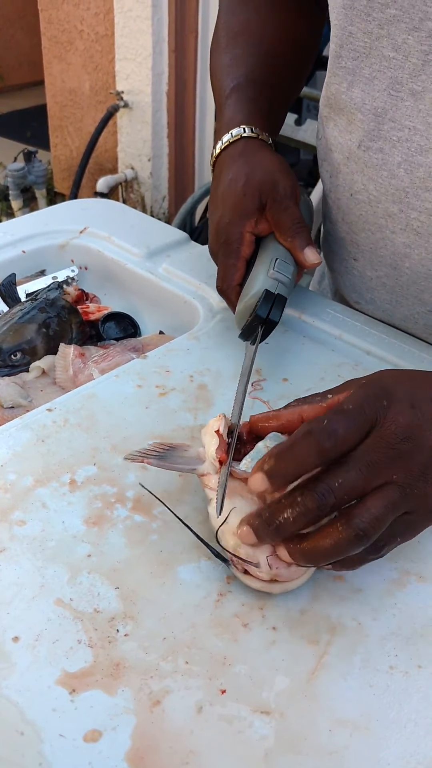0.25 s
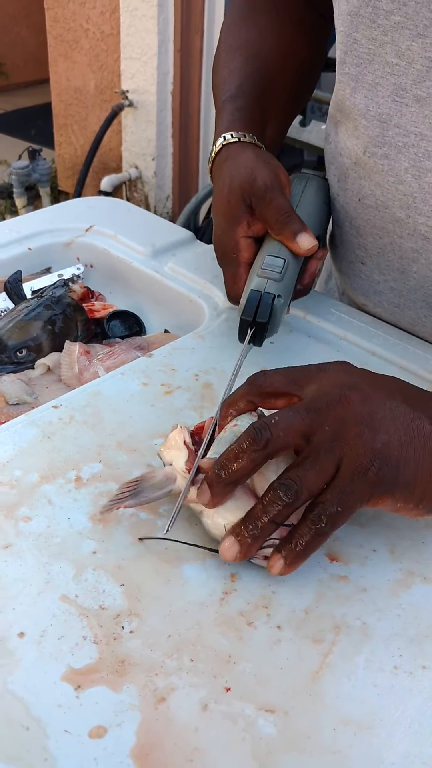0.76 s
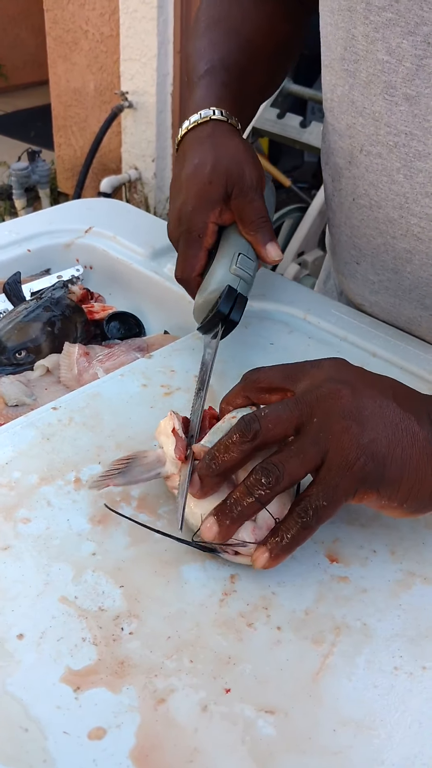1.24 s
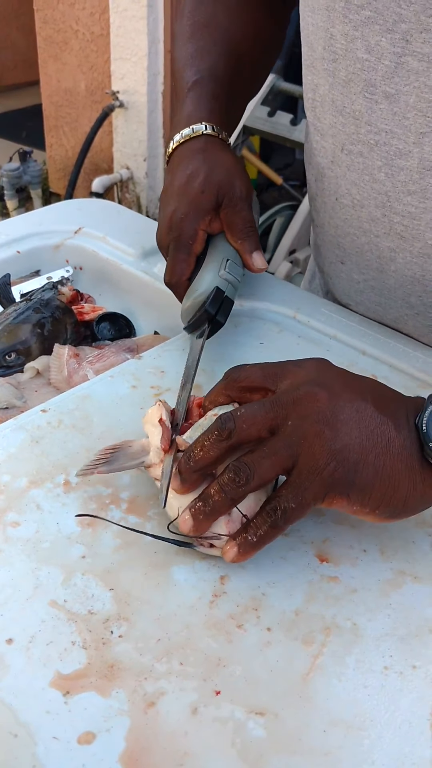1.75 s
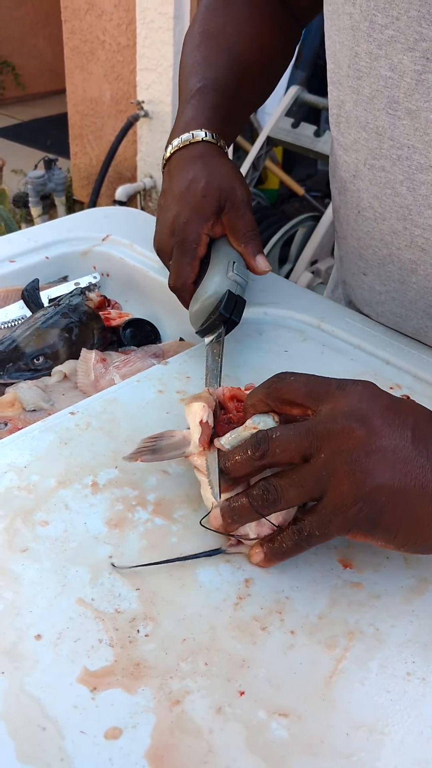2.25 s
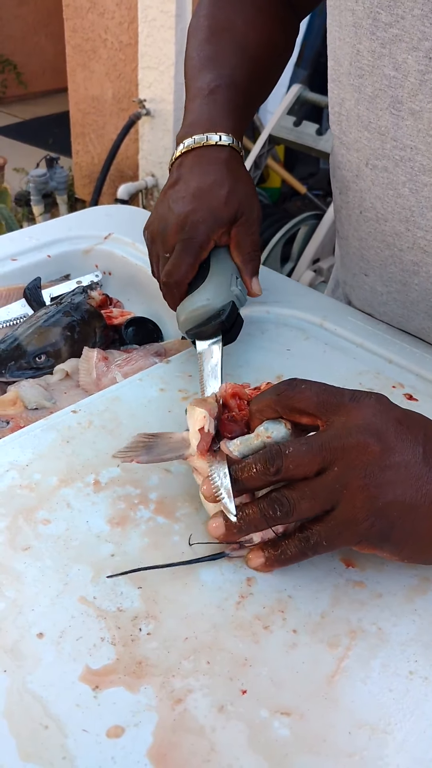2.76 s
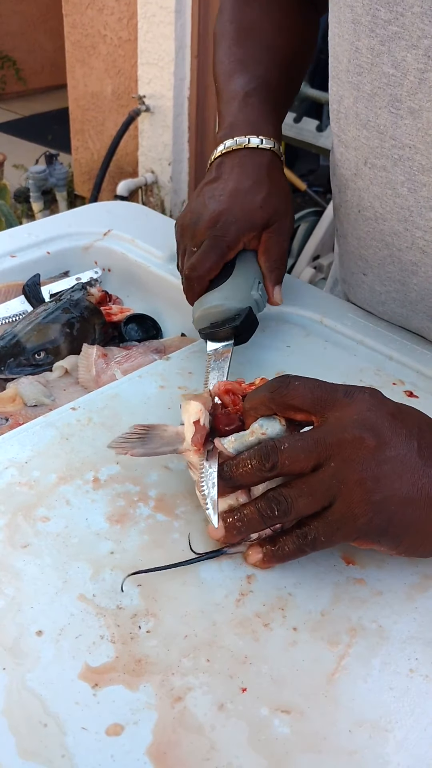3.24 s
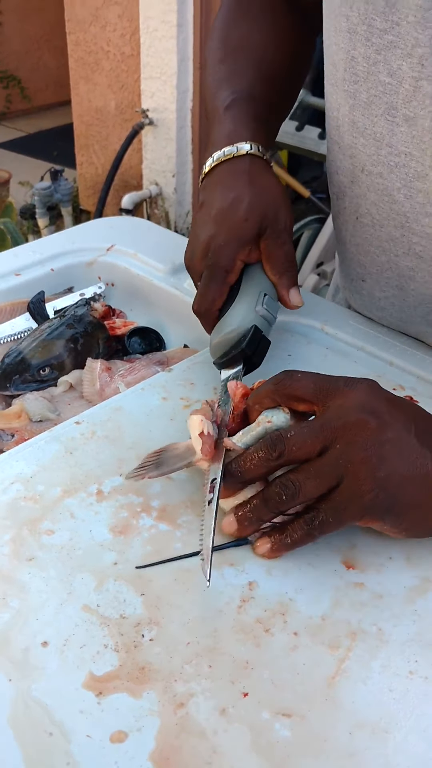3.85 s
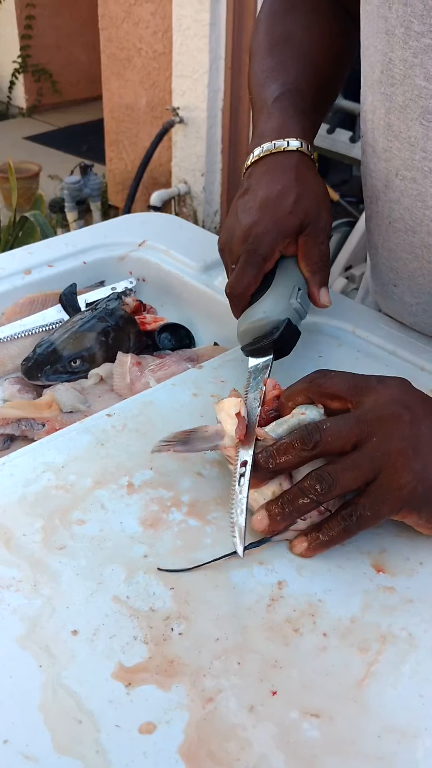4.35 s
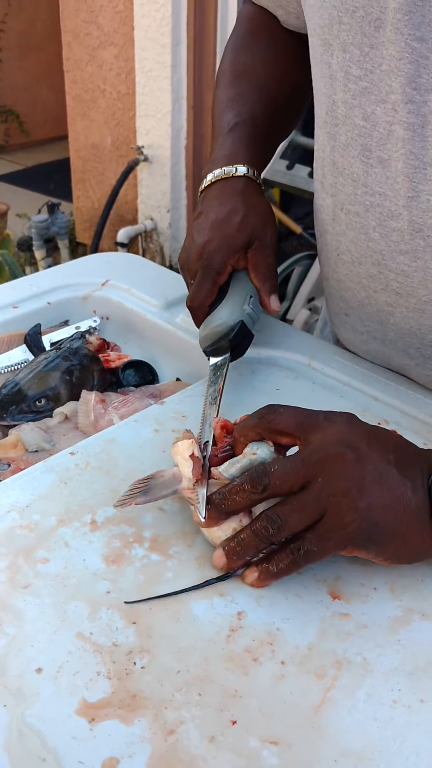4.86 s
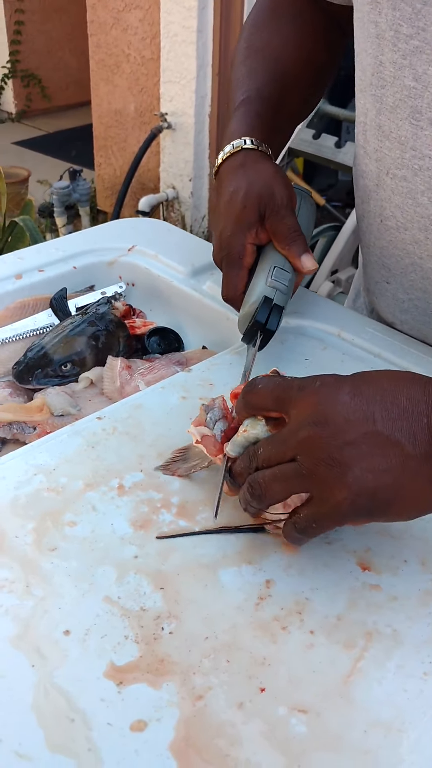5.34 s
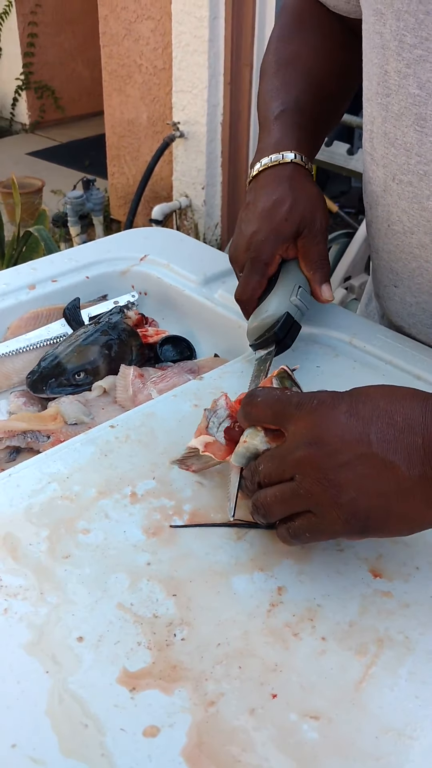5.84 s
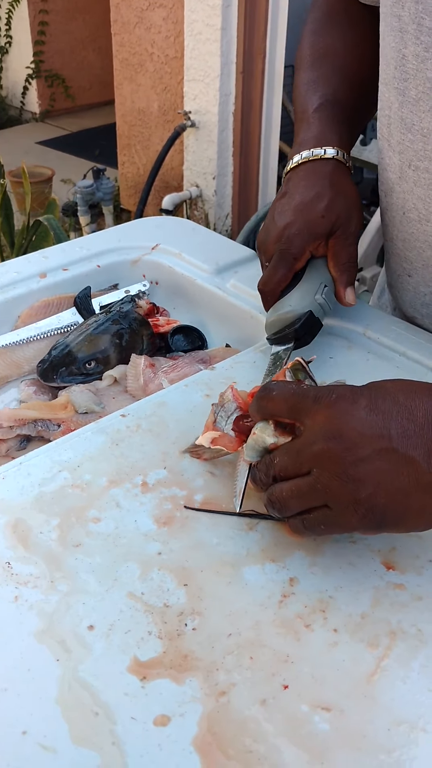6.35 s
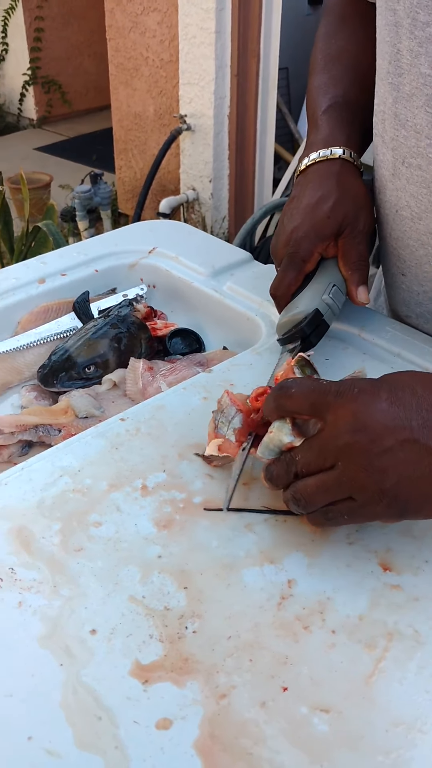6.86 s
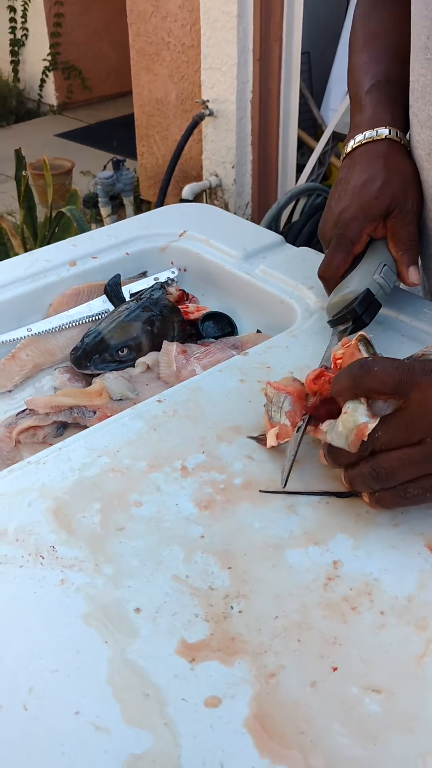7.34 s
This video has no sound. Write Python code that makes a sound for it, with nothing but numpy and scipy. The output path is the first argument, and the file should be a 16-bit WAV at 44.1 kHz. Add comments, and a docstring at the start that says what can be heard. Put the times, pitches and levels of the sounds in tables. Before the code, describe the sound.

A blunt tap, then a motorised twin-blade knife chatters harshly in bursts, winding down and spinning up again over faint insect-like outdoor hiss.

```python
"""A broad insect-like hiss (coloured noise) fills a yard from the start, with low gusts on the microphone later.
A knife is set against a fish head on a plastic table: a blunt tap rings the handle, and the table rumbles.
Then the electric motor runs and two blades saw: each stroke end is a grainy rattle, then a ringing knock.
Gears whirr between strokes as filtered grains, and the table hums in tones that follow the blade cycle.
The motor is let go and slows four times; after a fifth press it runs to the end."""
import sys
import numpy as np
from scipy import signal
from scipy.fft import rfft, irfft, next_fast_len
from scipy.io import wavfile

SR = 44100
rng = np.random.default_rng(int(sys.argv[2]) if len(sys.argv) > 2 else 0)


def file_out(sig):
    """Save sig as 16-bit WAV at sys.argv[1]."""
    # one column per channel
    cols = np.atleast_2d(sig).T
    # limit, then scale
    lim = np.clip(cols, -1, 1)
    pcm = np.round(lim * 32767).astype(np.int16)
    wavfile.write(sys.argv[1], SR, pcm)


def volts_from_db(level):
    """Convert decibel levels to linear amplitude ratios."""
    exponent = np.asarray(level, float) / 20
    return 10 ** exponent


N = 335160
TIME_S = np.arange(N) / SR


def rms_one(x):
    """Scales a sound to an rms of one."""
    return x / np.sqrt(np.mean(x ** 2) + 1e-20)


def in_time(rows, s=TIME_S):
    """Reads each column of a table at the given times, with straight lines between rows."""
    at, *columns = np.transpose(rows)
    return [np.interp(s, at, column) for column in columns]


def at_hz(points, hz, order=1):
    """Reads one column of a frequency table, with straight lines over log frequency."""
    table = np.array(points)
    return np.interp(np.log(hz + 1), np.log(table[:, 0]), table[:, order])


def filtered(x, order, hz, kind):
    """Butterworth filter."""
    return signal.sosfilt(signal.butter(order, hz, kind, fs=SR, output="sos"), x)


def colour(x, spectrum):
    """Causal (minimum-phase) filter with the given spectrum."""
    log_gain = at_hz(spectrum, np.fft.rfftfreq(4096, 1 / SR)) * np.log(10) / 20
    cepstrum = irfft(log_gain)
    cepstrum[1:2048] *= 2   # folding the cepstrum forward in time makes the filter causal
    cepstrum[2049:] = 0
    response = irfft(np.exp(rfft(cepstrum)))[:2048]
    return signal.fftconvolve(x, response)[:N]


def drift(rate):
    """Slow chance: a normal draw (spread 1) at each of `rate` knots per second, joined by lines."""
    knots = rng.standard_normal(int(N / SR * 60))
    return np.interp(TIME_S * rate, np.arange(len(knots)), knots)


def lay(at_s, rows):
    """Puts one short sound (a row) at each moment."""
    out = np.zeros(N + 2 * rows.shape[1])
    samples = (at_s[:, None] * SR).astype(int) + np.arange(rows.shape[1])
    np.add.at(out, samples, rows)
    return out[:N]


# strength of the yard's hiss: t/s, relative level/dB of the broad hiss, relative level/dB of its narrow core
YARD_LEVELS = [(0, -33, -32.5), (.6, -33, -32), (.9, -35, -45), (1.7, -36.5, -42.5), (2.2, -46, -47),
               (3.0, -38.5, -44.5), (4.0, -38.5, -44.5), (4.9, -42, -41), (5.5, -42, -41),
               (5.75, -37, -41.5), (6.1, -47, -40.5), (7.1, -39.5, -41.5), (7.4, -42, -42.5),
               (7.6, -40, -43)]
# tone colour of the broad hiss: f/Hz, relative level/dB (per Hz)
HISS_COLOUR = [(60, -11), (200, -16.5), (800, -9.5), (2400, -15), (2700, -7), (3300, -1.5), (4000, -9),
               (4300, -9), (7500, -15), (10000, -18.5), (12000, -28.5), (15000, -37), (15400, -62)]


def yard_hiss():
    """Broad coloured noise whose level wavers."""
    level_db = in_time(YARD_LEVELS)[0] + 1.5 + 2.0 * drift(20)
    return volts_from_db(level_db) * rms_one(colour(rng.standard_normal(N), HISS_COLOUR))


# lower and upper edge of the insects' band: f/Hz
CHORUS_EDGES = [3620, 4155]


def chorus():
    """Many far insects blur into a band of noise, the narrow core of the hiss."""
    level_db = in_time(YARD_LEVELS)[1] + 1.2 * drift(30)
    return volts_from_db(level_db) * rms_one(filtered(rng.standard_normal(N), 3, CHORUS_EDGES, "band"))


# low gusts on the microphone: middle t/s, length t/s, level/dB at the middle
GUST_ROWS = [(1.2, 0.57, -52), (1.7, .3, -52), (2.7, .4, -59), (3.7, .5, -59), (4.7, .5, -61)]
# lower and upper edge of the gusts' band: f/Hz
GUST_EDGES = [54, 126]


def gusts():
    """Lumpy deep noise that swells and fades."""
    swell = sum(volts_from_db(db) * np.exp(-8 * ((TIME_S - middle) / length) ** 2) for middle, length, db in GUST_ROWS)
    return swell * rms_one(filtered(rng.standard_normal(N), 2, GUST_EDGES, "band"))


# the table rumbles as the fish is pushed about on it: t/s, relative level/dB
RUMBLE_LEVELS = [(0, -46), (.4, -51), (.44, -50), (.455, -36), (.52, -42), (1.0, -42), (1.07, -38.5),
                 (1.55, -40), (1.67, -37.5), (2.0, -48), (2.55, -41), (3.0, -48), (3.4, -42), (3.98, -44.5),
                 (4.3, -40.5), (4.66, -37), (5.15, -45.5), (5.6, -44.5), (5.76, -38), (6.1, -44.5),
                 (6.6, -40.5), (7.2, -40.5), (7.5, -52), (7.6, -38)]


def rumble_level_db():
    """The pushing sets the level, and chance makes it lumpy."""
    return in_time(RUMBLE_LEVELS)[0] + 1.5 * drift(9.0)


# tone colour of the table's rumble: f/Hz, relative level/dB (per Hz)
RUMBLE_COLOUR = [(30, -24), (42, -14), (60, -6), (100, -5), (150, 1), (250, -2), (340, -6), (420, -16),
                 (560, -19), (700, -30), (1200, -88.5)]


def table_rumble(level_db):
    """Dull coloured noise from the table."""
    return volts_from_db(level_db + 9.0) * rms_one(colour(rng.standard_normal(N), RUMBLE_COLOUR))


def separate_rumble(level_db):
    """Each channel has a little rumble of its own."""
    both = [colour(rng.standard_normal(N), RUMBLE_COLOUR) for channel in range(2)]
    return volts_from_db(level_db - 7.0) * rms_one(np.array(both))


# the table top hums along while the fish is pressed down:
# from t/s, to t/s, multiple of the blade cycle, rms level/dB before the stereo spread
TABLE_TONES = [(2.103, 2.8, 3, -41.5), (2.4, 2.85, 4, -36), (2.398, 3.2, 5, -38.5), (2.6, 3.7, 7, -38.5),
               (2.7, 3.6, 9, -42), (4.4, 5.002, 2, -41), (4.3, 4.9, 6, -38), (4.3, 4.997, 8, -39),
               (4.4, 4.9, 10, -42), (5.8, 6.092, 6, -37), (6.0, 7.2, 3, -36.5), (5.988, 6.707, 10, -40)]


def table_hum():
    """Tones on multiples of the blade cycle (two strokes) swell and fade."""
    cycle, out = np.pi * strokes_done(), np.zeros(N)
    for start, end, multiple, db in TABLE_TONES:
        swell = np.clip(np.minimum(TIME_S - start, end - TIME_S) / 0.083, 0, 1)
        tone = np.sin(round(multiple) * cycle + multiple ** 2)   # the square only sets a starting phase
        out += volts_from_db(db) * np.sqrt(2) * swell * tone
    return out


# the trigger: pressed t/s, let go t/s, coasting loss [stroke ends/s per s],
# quick first loss [stroke ends/s; below zero is a gain]
TRIGGER_PULLS = [(0.657, 1.069, 51.8, 4.6), (1.597, 3.458, 68.2, 4.9), (3.9885, 5.065, 64.4, -0.1),
                 (5.6335, 7.151, 174.1, -4.0), (7.486, 8, 0, 0)]
# full speed that the load allows: t/s, speed [stroke ends/s]
LOADED_SPEED = [(0.9, 61.06), (1.9, 61.43), (2.6, 61.69), (3.4, 60.26), (4.4, 59.81), (5.0, 60.53),
                (6.0, 58.73), (6.7, 56.87), (7.0, 51.53), (7.2, 50.49)]


def motor_speed():
    """Pressed, the motor closes in on full speed; let go, it shifts a little at once and coasts down evenly."""
    spin_up_s, first_loss_s = .082, .05
    kick_speed, crawl_speed = 26.23, .5   # speed before the first press, and least when coasting: stroke ends/s
    full, = in_time(LOADED_SPEED)
    speed = np.full(N, kick_speed)
    for pressed, let_go, loss, first_loss in TRIGGER_PULLS:
        missing = np.interp(pressed, TIME_S, full - speed)
        closing_in = full - missing * np.exp(-np.maximum(TIME_S - pressed, 0) / spin_up_s)
        speed = np.where(TIME_S < pressed, speed, closing_in)
        since = np.maximum(TIME_S - let_go, 0)
        coasting = np.interp(let_go, TIME_S, speed) - loss * since
        coasting = coasting - first_loss * (1 - np.exp(-since / first_loss_s))
        speed = np.where(TIME_S < let_go, speed, np.maximum(coasting, crawl_speed))
    return speed


def slack():
    """How far the motor is below full speed, in stroke ends per second."""
    return in_time(LOADED_SPEED)[0] - motor_speed()


def strokes_done():
    """Summed speed counts the strokes, from zero at the first stroke end."""
    first_stroke_s = .6164
    turns = np.cumsum(motor_speed()) / SR
    return turns - turns[round(first_stroke_s * SR)]


# gears between strokes: t/s, relative level/dB through the handle, relative level/dB through the vents
GEAR_LEVELS = [(.6, -28, -21), (.8, -31.5, -39.5), (1.3, -32.5, -37), (1.6, -28.5, -28),
               (2.05, -36.5, -41.5), (2.6, -35, -31), (3.0, -35, -41), (3.6, -33, -39), (4.0, -31.5, -43),
               (4.5, -30.5, -36), (4.9, -32.5, -37), (5.5, -30, -56), (5.88, -27, -40),
               (6.13, -36.5, -44.5), (6.75, -25, -42.5), (7.1, -28.5, -39), (7.35, -33, -44),
               (7.6, -33, -34)]
# tone colour of the gears: f/Hz, relative level/dB (per Hz)
GEAR_COLOUR = [(400, -15.5), (770, 6), (950, 0), (1300, 2), (1900, -5), (2350, -8), (3100, 1), (4000, -14),
               (5000, -12), (7000, -14.5), (10500, -32), (12000, -18), (14000, -83), (16000, -20)]


def gears():
    """Tooth contacts blur into a grainy whirr, dull through the handle and bright through its vents."""
    split_hz = 2300
    grain_db = 2.5 * np.minimum(rng.exponential(1, N), 3) + 1.5 * drift(45)
    whirr = colour(rng.standard_normal(N) * volts_from_db(grain_db), GEAR_COLOUR)
    dull, bright = rms_one(filtered(whirr, 4, split_hz, "low")), rms_one(filtered(whirr, 4, split_hz, "high"))
    handle_db, vents_db = in_time(GEAR_LEVELS)
    play = slack()
    running = np.interp(TIME_S, [.6, .68], [0, 1])
    through_handle = volts_from_db(handle_db - 0.1737 * play - 4.0) * dull   # a slow motor whirrs more softly
    through_vents = volts_from_db(vents_db - 0.299 * play + 1.5) * bright
    return running * (through_handle + through_vents)


# the grip and the load shift the handle's upper ring: t/s, f/Hz, level/dB over the lowest mode
GRIP_MODE = [(0.62, 1430, 8.5), (0.83, 1390, 1.5), (1.49, 1256, 7), (1.75, 1415, 10), (3.26, 1354, 10),
             (3.75, 1195, 1.5), (4.91, 1316, 8.5), (5.46, 1140, 2), (5.83, 1230, 3.5), (7.07, 1154, 6),
             (7.6, 1145, 3.5)]
# the handle's other modes, before chance shifts them: f/Hz, level/dB against the lowest, time to fall 60 dB t/s
HANDLE_MODES = [(787, 0, 0.023), (1080, -16, 0.024), (1671, -10.5, 0.02), (1937, -10.5, 0.022),
                (3116, -2.5, 0.005), (3590, -1, 0.0052)]


def knock(s, level_db):
    """A blunt blow sets the handle's modes ringing, with fresh pitches and strengths each time."""
    rise_ms, detune, grip_t60_s = .8, .018, .012
    t, ring = np.arange(1500) / SR, 0
    modes = HANDLE_MODES + [(*in_time(GRIP_MODE, s), grip_t60_s)]
    for hz, db, t60 in modes:
        chance = rng.standard_normal((len(s), 2))
        pitch = (hz * (1 + detune * chance[:, 0]))[:, None]
        strength_db = (db + 1.8 * chance[:, 1])[:, None]
        ring = ring + volts_from_db(strength_db - 60 * t / t60) * np.sin(2 * np.pi * pitch * t)
    blunt = 1 - np.exp(-t * 1000 / rise_ms)
    return lay(s, volts_from_db(level_db)[:, None] * ring * blunt)


# the knife is set against the fish: t/s, relative level/dB
FISH_TOUCHES = [(0.451, -29)]


def touch():
    """Setting the knife down rings the handle like a knock."""
    return knock(*np.transpose(FISH_TOUCHES))


def handle_blows(s, knock_db, lag_s):
    """The drive knocks in the handle, and the clatter starts the ring softly."""
    drive = knock(s + lag_s - .002, knock_db + 10.5)
    soft_start = knock(s - .0025, knock_db - 0.5)
    return filtered(drive + soft_start + touch(), 4, 620, "high")   # a small handle radiates no bass


# tone colour of the blades' clatter: f/Hz, relative level/dB (per Hz)
RATTLE_COLOUR = [(400, -35), (900, -9.5), (1800, -1.5), (2350, -0.5), (3000, 4.5), (4000, -4), (5000, 4),
                 (5700, -7), (7100, 1.5), (7600, -1), (8500, -6.5), (9800, -1), (10500, -5.5),
                 (12000, -19.5), (14200, -26), (15200, -28), (16000, -41)]


def rattle(s, level_db, lag_s):
    """Slack blades clatter in a grainy burst, again as the drive knocks; chance sets each band's strength."""
    early_ms, fall_ms, tail_ms = 2.2, 1.9, 3.3
    stretch, echo, tail, grain_db = 0.017, 0.31, 0.11, 3.6   # stretch is per ms of lag
    t, out = np.arange(900) / SR, 0
    longer = (1 + stretch * lag_s * 1000)[:, None]   # slow strokes clatter longer
    fall_ms = fall_ms * longer * np.exp(0.21 * rng.standard_normal((len(s), 1)))

    def burst(since):
        """Starts at once and dies away."""
        return (since > 0) * np.exp(-np.abs(since) * 1000 / fall_ms)

    shape = burst(t) + echo * burst(t - lag_s[:, None]) + tail * np.exp(-t * 1000 / tail_ms)
    grains = volts_from_db(grain_db * np.minimum(rng.exponential(1, shape.shape), 3))
    clatter = shape * rng.standard_normal(shape.shape) * grains
    clatter /= np.sqrt(np.mean(clatter ** 2, axis=1, keepdims=True))
    edges_hz = [300, 2400, 4200, 6000, 8000, 10000, 17000]
    for low, high in zip(edges_hz, edges_hz[1:]):
        gains = volts_from_db(level_db + 1.5 * rng.standard_normal(len(s)))
        bursts = lay(s - early_ms / 1000, gains[:, None] * clatter)
        out = out + filtered(bursts + 1e-18, 2, [low, high], "band")
    return volts_from_db(5.5) * colour(out, RATTLE_COLOUR)


# how the cut loads the drive, before slack and chance: t/s, relative knock level/dB forward, the same back,
# relative rattle level/dB forward, the same back, basic delay from rattle to knock [ms]
STROKE_LOADS = [(.62, -48, -37, -20.5, -31, .1), (.7, -27, -38, -22, -22.5, 0.093),
                (.85, -40, -28, -22, -22, 1.07), (1.15, -34, -31, -26.5, -26.5, 1.04),
                (1.5, -35.5, -29.5, -24.5, -25.5, .1), (1.9, -31.5, -36, -24, -23, .9),
                (2.2, -40, -31.5, -29.5, -25, 1.07), (2.7, -35.5, -37.5, -23.5, -24.5, 0.99),
                (3.4, -34.5, -35.5, -22.5, -27.5, 0.92), (3.6, -28.5, -27, -23, -27, 2.5),
                (3.95, -34, -38, -22.5, -33, 2), (4.03, -35, -32, -22, -22, 1.5),
                (4.15, -33, -27, -23, -23.5, 1.5), (4.5, -23.5, -25.5, -29, -25.5, 1.41),
                (5.0, -34, -35, -21.5, -22, 0.97), (5.3, -31, -38, -28, -30.5, 3),
                (5.62, -33, -37, -26, -32, 1.5), (5.7, -26, -27, -21, -22, 1.5),
                (5.9, -32, -24, -22.5, -25.5, 2.3), (6.2, -28, -22.5, -24.5, -25.5, 3.44),
                (6.75, -23, -19.5, -24.5, -23.5, 3.78), (6.95, -22.5, -15.5, -31, -21.5, 3.8),
                (7.2, -22, -14.5, -30, -19.5, 2.97), (7.3, -27, -17.5, -26, -23.5, 0.72),
                (7.4, -36, -32, -33, -25, .1), (7.53, -26, -26, -26, -21, 0.12),
                (7.6, -19, -16, -20, -19, 2.1)]


def stroke_ends():
    """A stroke ends as the summed speed passes a whole number; forward and back alternate."""
    switch_on_s, jitter_ms, sway_db, sway_per_s = .6218, .5, 1.5, 6.0
    turns = strokes_done()
    s = np.interp(np.arange(int(turns[-1]) + 1), turns, TIME_S)
    knock_fwd, knock_back, rattle_fwd, rattle_back, lag_ms = in_time(STROKE_LOADS, s)
    at = (s * SR).astype(int)
    back = np.arange(len(s)) % 2 == 1
    side = np.where(back, 1, -1)
    play = slack()[at]   # below full speed the drive has play
    knock_db = np.where(back, knock_back + 0.1486 * play, knock_fwd + 0.2733 * play)
    rattle_db = np.where(back, rattle_back, rattle_fwd) - 0.0027 * play
    # forward and back strokes trade strength slowly
    knock_db = knock_db + sway_db * side * drift(sway_per_s)[at]
    rattle_db = rattle_db + sway_db * side * drift(sway_per_s)[at]
    rattle_db = rattle_db + 1.6 * rng.standard_normal(len(s))   # chance varies the loudness from stroke to stroke
    lag_ms = np.maximum(lag_ms, 0) + np.minimum(.17 * play, 6.0)   # play delays the knock, by 6 ms at most
    s = np.maximum(s, switch_on_s) + jitter_ms / 1000 * rng.standard_normal(len(s))
    return s, knock_db, rattle_db, lag_ms / 1000


def airborne(s, rattle_db, lag_s):
    """All that is made of grains and noise: blades, gears and yard."""
    return rattle(s, rattle_db, lag_s) + gears() + yard_hiss() + chorus()


# tone colour of the separate noise draws added to each channel,
# which make the stereo image more diffuse: f/Hz, relative level/dB
DIFFUSE_COLOUR = [(800, -38), (1500, -15), (2300, -11.5), (4000, -17), (8000, -4), (11500, -12),
                  (12500, -13.5), (15000, -4)]


def diffuse_grains(s, rattle_db, lag_s):
    """Fresh noise grains for each channel, with bursts on the same strokes."""
    return [colour(airborne(s, rattle_db, lag_s), DIFFUSE_COLOUR) for channel in range(2)]


# stereo width: f/Hz, level/dB of the side signal, lean to the left as a phase [rad]
STEREO_WIDTH = [(60, -8, 0.33), (100, -20, 0.86), (170, -18.5, 0.6), (280, -18.5, -0.98),
                (500, -6.5, -0.38), (750, -11.5, 0.58), (1090, -18, -0.14), (1720, -6, 0.45),
                (2420, -4, -0.59), (2770, 0, -0.018), (16000, 1, 1)]


def spread(air):
    """The right channel gets the sound upside down and a little earlier; the image narrows under 2.5 kHz."""
    right_lead_s = 0.0004023
    size = next_fast_len(N + 4096)
    hz, now = np.fft.rfftfreq(size, 1 / SR), rfft(air, size)
    late = now * np.exp(-2j * np.pi * hz * right_lead_s)
    narrowing = volts_from_db(at_hz(STEREO_WIDTH, hz)) * np.exp(-1j * at_hz(STEREO_WIDTH, hz, order=2))
    mid, side = (late - now) / 2, narrowing * (late + now) / 2
    left_right = irfft(np.array([mid + side, mid - side]), size)[:, :N]
    return left_right * volts_from_db([[-.3], [.3]])


def scene():
    """Knife, table and yard, spread over two channels."""
    s, knock_db, rattle_db, lag_s = stroke_ends()
    rumble_db = rumble_level_db()
    table = table_rumble(rumble_db) + table_hum()
    shared = airborne(s, rattle_db, lag_s) + handle_blows(s, knock_db, lag_s) + table
    return spread(shared) + diffuse_grains(s, rattle_db, lag_s) + separate_rumble(rumble_db) + gusts()


def roll_off(x):
    """The treble ends steeply here."""
    return signal.sosfilt(signal.butter(12, 16490, fs=SR, output="sos"), x)


def record(dry):
    """A steep low-pass at 15 kHz cuts the top."""
    mix = filtered(dry, 10, 15000, "low")
    return roll_off(mix)


dry = scene()
out = record(dry)
file_out(out)
```